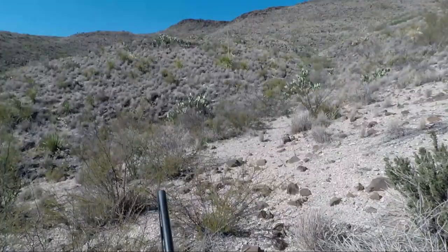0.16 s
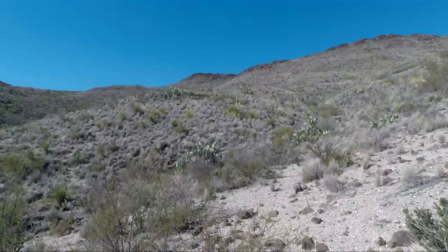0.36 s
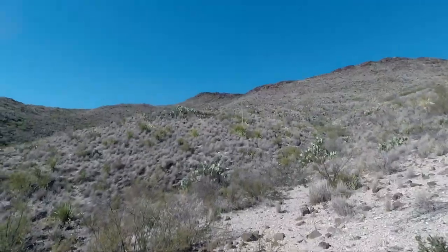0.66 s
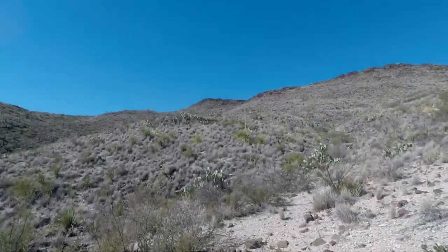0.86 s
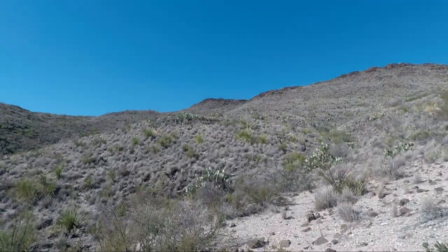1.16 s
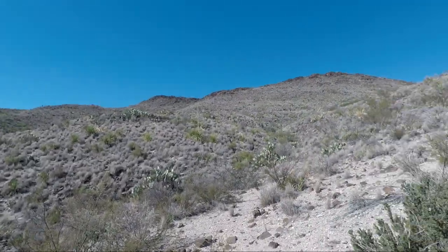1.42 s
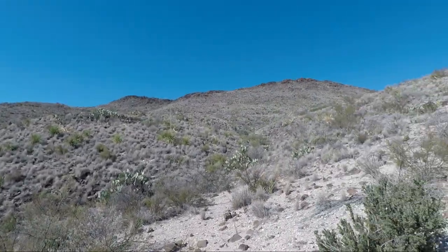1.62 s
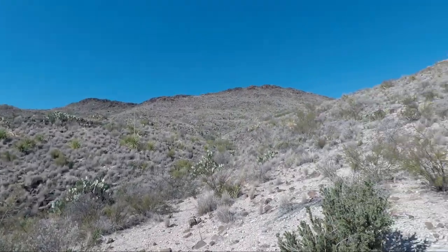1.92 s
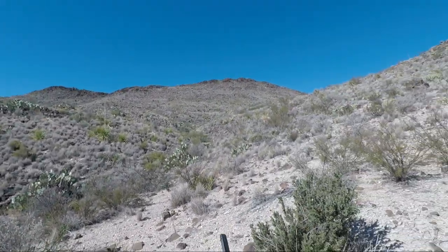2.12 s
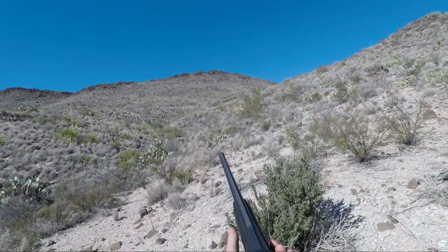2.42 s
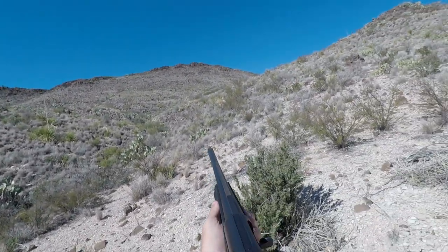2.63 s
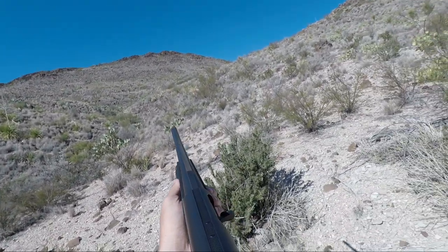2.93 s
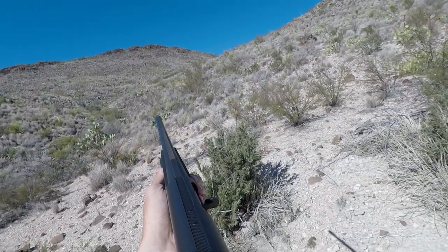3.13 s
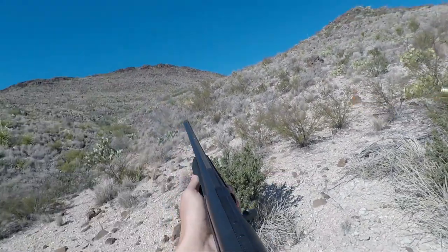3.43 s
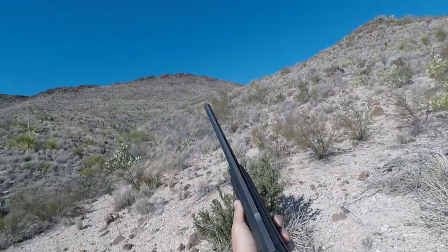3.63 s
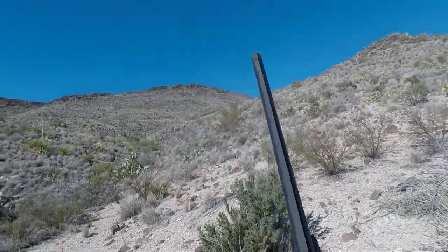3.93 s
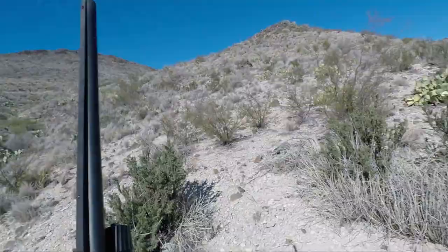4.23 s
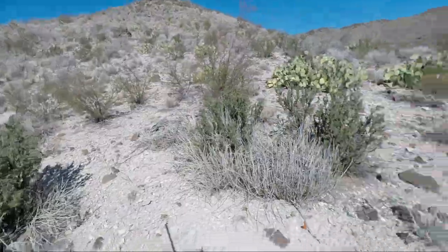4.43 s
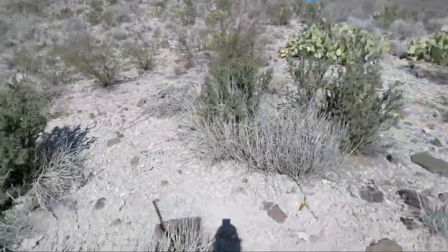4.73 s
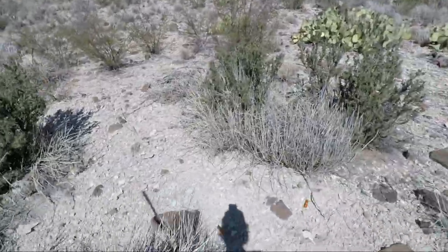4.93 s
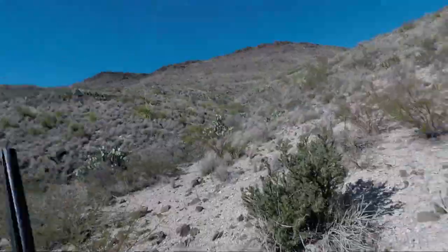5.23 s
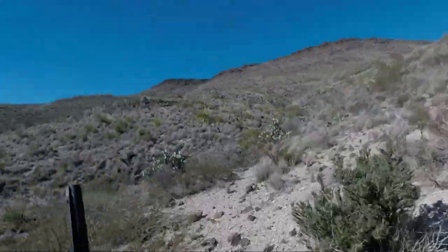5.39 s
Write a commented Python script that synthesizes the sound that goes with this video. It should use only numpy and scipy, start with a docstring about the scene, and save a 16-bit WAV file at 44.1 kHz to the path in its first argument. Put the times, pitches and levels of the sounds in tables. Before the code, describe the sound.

Close to a body-worn microphone, a shotgun action rattles and scrapes open early on, its barrel ringing briefly. Small metal clicks follow, then sharp clacks as a shell goes home. A heavy double knock and crack slam it shut, and the slope returns a long wash. Low wind throbs and pops throughout, mostly on the right, dropping after the slam, with little stone ticks and a rising gust at the end.

```python
"""Shotgun action on a windy hillside

A shotgun is handled just below a body-worn microphone: steel drags in stick-slip and struck modes decay
as the action scrapes open, the barrel rings, a shell clicks home and the action slams shut with a squeak.
Decaying noise and clustered echoes return the slam from the slope and outcrops. Shaped noise and sinking
tones make the wind, strongest at the right port, with grainy rustles; stones tick and a bird calls once."""
import sys
import numpy as np
from scipy import signal
from scipy.fft import rfft, irfft, next_fast_len
from scipy.io import wavfile
from scipy.ndimage import map_coordinates

SR = 44100
rng = np.random.default_rng(int(sys.argv[2]) if len(sys.argv) > 2 else 0)


def wav_record(signal):
    """Record a signal, one row per channel, as 16-bit PCM in the file named by sys.argv[1]."""
    frames = np.transpose(np.atleast_2d(signal))
    bounded = np.clip(frames, -1, 1)
    # unit amplitude maps onto the largest positive 16-bit level
    quanta = np.round(bounded * 32767).astype(np.int16)
    wavfile.write(sys.argv[1], SR, quanta)


N = 245195

# strength of the wind at the microphone, gust by gust: time_s, level_db
WIND_STRENGTH = [(0.0, -18.5), (0.16, -23.5), (0.25, -20.5), (0.31, -25.5), (0.38, -26), (0.5, -15.5),
                 (0.55, -32), (0.6, -20), (0.72, -33.5), (0.79, -28.5), (0.86, -33.5), (0.92, -24),
                 (0.99, -33), (1.12, -22.5), (1.27, -34), (1.38, -17.5), (1.52, -22), (1.63, -18.5),
                 (1.72, -23), (1.85, -17.5), (1.95, -14.5), (2.15, -16.5), (2.19, -23), (2.24, -16.5),
                 (2.32, -22), (2.4, -19.5), (2.56, -17.5), (2.63, -24.5), (2.7, -12.5), (2.78, -26),
                 (2.84, -14.5), (3.05, -27), (3.15, -20.5), (3.2, -25), (3.27, -16), (3.36, -34.5),
                 (3.42, -18.5), (3.54, -47.5), (3.78, -51.5), (4.3, -39.5), (4.53, -36.5), (4.62, -29),
                 (4.73, -36), (4.89, -29), (5.02, -35), (5.1, -22.5), (5.26, -16), (5.37, -20.5),
                 (5.56, -31)]
# spectrum of struck or rubbed steel: frequency_hz, density_db
STEEL_SPECTRUM = [(530, -31), (900, -7), (1580, 4), (2110, 4), (2470, 3), (3220, 0.5), (3900, -4),
                  (4850, -2.5), (6630, 0), (8240, -15.5), (9180, -15.5), (11500, -36.5), (12600, -32.5),
                  (15200, -37.5), (16000, -51.5)]
# spectrum of the stock and receiver: frequency_hz, density_db
BODY_SPECTRUM = [(120, -14.5), (300, -8), (700, -4), (1200, 0.5), (2000, -40)]
# blows of the closing action: time_s, relative knock_db, relative crack_db, crack_t60_s
BLOWS = [(3.2558, -31.5, -25, 0.02), (3.2779, -5, -18, .016), (3.2876, -3, -13, 0.015),
         (3.2951, -16.5, -2.5, 0.011), (3.2989, -14, 1, 0.0079)]


def amp(db):
    """Level to amplitude: 20 dB is a factor of ten."""
    return 10 ** (np.asarray(db) / 20)


def unit(x):
    """Normalisation to an rms of 1."""
    return x / np.sqrt(np.mean(x ** 2) + 1e-20)


def along(points, hz):
    """Interpolation of (frequency_hz, value) points on a logarithmic frequency axis."""
    f, v = np.transpose(points)
    return np.interp(np.log(hz + 1), np.log(f), v)


def curves(rows):
    """Linear interpolation in time: one curve for each column after time_s."""
    s, *cols = np.transpose(rows)
    return [np.interp(np.arange(N) / SR, s, c) for c in cols]


def wobble(rate):
    """Band-limited random modulation: a smooth curve through rate random knots a second."""
    knots = rng.standard_normal(int(N * rate / SR) + 4)
    return map_coordinates(knots, [np.arange(N) * rate / SR])


def filtered(x, response):
    """Linear filtering: the spectrum of x is multiplied by a response of frequency."""
    m = next_fast_len(N + SR // 2)
    return irfft(rfft(x, m) * response(np.fft.rfftfreq(m, 1 / SR)), m)[..., :N]


def mid_side(mid, side, apart):
    """Partial coherence: both channels share mid and take side with opposite signs."""
    return np.array([mid + apart * side, mid - apart * side])


def noise(colour, apart):
    """Coloured stereo noise of rms 1; apart sets the size of what the channels do not share."""
    white = rng.standard_normal((2, N))
    mid, side = filtered(white, lambda hz: amp(along(colour, hz)) * (hz > 12))
    return unit(mid_side(mid, side, apart))


def grains(colour, rate, spread_db, apart):
    """Shot noise: random clicks of uneven size, rate a second on average, coloured and set to rms 1."""
    happens = rng.random(N) < rate / SR
    size = amp(spread_db * np.minimum(rng.standard_normal(N), 2))
    clicks = happens * size * rng.choice([-1, 1], (2, N))
    mid, side = filtered(clicks, lambda hz: amp(along(colour, hz)))
    return unit(mid_side(mid, side, apart))


def pan(db):
    """Level difference between channels: left over right in dB, with a mean gain of 1."""
    gains = amp([[db / 2], [-db / 2]])
    return gains / gains.mean()


def since(s, length):
    """Local time: the samples that follow a moment, and their age in seconds."""
    i = np.arange(round(s * SR), min(round((s + length) * SR), N))
    return i, (i - i[0]) / SR


def fade(t, t60):
    """Exponential decay by 60 dB in t60 seconds, 1 ms at the shortest."""
    return np.exp(-np.log(1000) * t / max(t60, 1e-3))


def ring(modes, t):
    """Modal superposition: damped sines (frequency_hz, level_db, t60_s) struck together."""
    return sum(amp(db) * fade(t, t60) * np.sin(2 * np.pi * hz * t) for hz, db, t60 in modes)


def echo(x, t60s, hold=1):
    """Diffuse reverberation: noise with its own decay at each frequency; hold above 1 fills the early tail."""
    hz, t, z = signal.stft(rng.standard_normal((2, SR)), SR, nperseg=256)
    decay_db = -60 * (t / along(t60s, hz)[:, None]) ** hold
    tail = signal.istft(z * amp(decay_db), SR, nperseg=256)[1]
    return signal.fftconvolve(x.mean(0)[None], tail / np.linalg.norm(tail[0]), axes=1)[:, :N]


def ports(x):
    """Diffraction and phase lag: sound from the right reaches the left port shaded and out of step."""
    # phase by which the left port leads: frequency_hz, lead_rad
    lead = [(100, -1.5), (800, 1), (1600, -1.5), (3300, -5.5), (5500, -8.5), (10000, -8), (15000, -7.5)]
    # response of the left port relative to the right: frequency_hz, gain_db
    shade = [(150, -2), (600, 2), (1000, -18.5), (1700, -12), (3500, -9), (7000, -3), (12000, 0)]

    def response(hz):
        phase = along(lead, hz) * np.array([[.5], [-.5]])
        return np.exp(1j * phase) * amp(np.outer([1, 0], along(shade, hz)))
    return filtered(x, response)


def right_port(x):
    """Crosstalk: what strikes the right port leaks into the left channel, inverted above the bass."""
    # leak into the left channel: frequency_hz, signed gain
    leak = [(40, 0.98), (90, 0.36), (200, -0.17), (600, -0.46), (1200, -1.02)]
    return np.array([filtered(x, lambda hz: along(leak, hz)), x])


def air(rush_db=-1, twig_db=-6, twig_rate=250, spread_db=4):
    """Broadband turbulence: air rushes unevenly through dry, ticking twigs under a fine hiss."""
    # level of the rush in the brush, before rush_db: time_s, level_db
    rush_level = [(0, -56), (0.75, -59.5), (1.4, -56), (2.1, -53.5), (2.4, -57.5), (3.3, -57.5),
                  (3.95, -65.5), (4.3, -64), (5.0, -60.5), (5.2, -55.5), (5.56, -59)]
    # spectrum of the rush: frequency_hz, density_db
    rush_colour = [(150, -7), (350, -1), (800, -2), (1600, -5.5), (2400, -15.5), (4000, -27), (8000, -45),
                   (14000, -70)]
    # relative level of the treble hiss: time_s, level_db
    hiss_level = [(0, -56), (0.3, -57.5), (0.8, -59.5), (1.4, -56), (2.2, -59), (3.34, -57.5),
                  (3.46, -76.5), (3.85, -80.5), (4.55, -73), (5.3, -63)]
    # spectrum of the hiss: frequency_hz, density_db
    hiss_colour = [(1200, -5.5), (3200, 0.5), (5000, -5), (7000, -1.5), (8500, -3.5), (10300, -4.5),
                   (12000, -10.5), (15000, -35)]
    twigs = grains(rush_colour, twig_rate, spread_db, apart=0.22)
    rush = noise(rush_colour, apart=0.14) + amp(twig_db) * twigs
    level_db = curves(rush_level)[0] + rush_db + 1.0 * wobble(5.4) + 2.2 * wobble(110)
    hiss = noise(hiss_colour, apart=0.92) * amp(curves(hiss_level)[0] - 2.0)
    return rush * amp(level_db) * pan(0.5) + hiss


def gust():
    """Relative level: how far the wind is above its usual strength, in dB."""
    usual_db = -21
    return curves(WIND_STRENGTH)[0] - usual_db


def wind(buffet_db=-20, uneven_db=1.5, left_db=-11):
    """Flow noise: eddies throb at the ports, with a faster flutter above them, mostly on the right."""
    # spectrum of the eddies: frequency_hz, density_db
    buffet = [(11, -38), (18, -14), (28, 5.5), (41, 4), (52, -5), (70, -15.5), (110, -21), (140, -54),
              (240, -120)]
    # spectrum of the flutter: frequency_hz, density_db
    flutter_colour = [(40, -26), (70, 1.5), (95, -0.5), (140, -11), (200, -14.5), (300, -15.5), (600, -25),
                      (1200, -27.5), (2500, -61)]
    flutter_db, flutter_grows = -36, 0.59  # level in the usual wind, dB per dB of wind
    eddies = signal.hilbert(noise(buffet, apart=0.28))
    throb = unit(eddies.real / (np.abs(eddies) + 1))  # the swing is evened out; gusts set its size
    flutter_level_db = flutter_db + flutter_grows * gust() + 3 * wobble(25)
    left, right = noise(flutter_colour, apart=1) * amp(flutter_level_db)
    flutter = right_port(right) + amp(left_db) * right_port(left)[::-1]
    return throb * amp(buffet_db + gust() + uneven_db * wobble(8.8)) * pan(-14.0) + flutter


def pops(rise_s=0.00085, puff_t60_s=0.091, push_gain_db=10, puff_gain_db=13.5, count=16):
    """Vortex impact: each push swells as its pitch drops, with a puff of turbulence and a shaking mount."""
    # the strongest dull pops: time_s, relative push_db, start_hz, relative puff_db
    strong = [(0.088, -21, 630, -44.5), (0.247, -21, 130, -54), (0.284, -18.5, 129.5, -52),
              (1.359, -17.5, 329, -37), (1.992, -17, 400, -38), (2.099, -11, 620, -30.5),
              (2.121, -18.5, 562.5, -35.5), (2.314, -18.5, 198, -59), (2.536, -18, 902, -41.5),
              (2.665, -21.5, 333, -49), (2.715, -14.5, 611.6, -38.5), (2.853, -16.5, 400, -45),
              (2.871, -17.5, 130, -52), (2.943, -15, 559.5, -45), (3.104, -18, 420, -60),
              (3.191, -18.5, 452, -53), (3.273, -15.5, 400, -29), (3.303, -16, 399, -32.5),
              (3.396, -10, 336, -52.5), (4.171, -25.5, 395, -49.5), (4.204, -31.5, 454.5, -50.5),
              (4.427, -26.5, 598, -52.5), (4.96, -37, 279, -58.5), (5.074, -19, 700.5, -35.5),
              (5.091, -33.5, 600, -47.5), (5.150, -20.5, 527, -37.5), (5.251, -24, 421, -48),
              (5.279, -15.5, 259, -42.5), (5.336, -21, 620, -47), (5.372, -19.5, 430, -43),
              (5.455, -19, 127.5, -55.5), (5.511, -19, 490, -51)]
    # spectrum of the puff: frequency_hz, density_db
    puff_colour = [(70, -18), (150, -10), (250, 8.5), (380, -2.5), (600, -7.5), (1200, -18.5), (4000, -57)]
    push_end_hz, push_fall_s = 71, .0052  # the pitch sinks towards this, with this time constant
    push_rise_s, push_t60_s = 0.0074, 0.057
    mount_hz, mount_db, mount_t60_s = 99, -11.5, .2  # level relative to push_db
    # chance pops, relative to the wind
    small_push_db, small_puff_db, small_start_hz = -12.5, -34.5, 307
    out, puff = np.zeros(N), noise(puff_colour, apart=0)[0]
    times = rng.uniform(0, N / SR - .05, count)
    winds_db = np.interp(times, *np.transpose(WIND_STRENGTH))
    small = [(s, db + small_push_db, small_start_hz, db + small_puff_db) for s, db in zip(times, winds_db)]
    for s, push_db, start_hz, puff_db in small + strong:
        i, t = since(s, 0.18)
        pitch_hz = push_end_hz + (start_hz - push_end_hz) * np.exp(-t / push_fall_s)
        swell = 1 - np.exp(-(t / push_rise_s) ** 2)
        push = np.sin(2 * np.pi * np.cumsum(pitch_hz) / SR) * swell * fade(t, push_t60_s)
        shake = amp(mount_db) * ring([(mount_hz, 0, mount_t60_s)], t) * swell
        turbulence = puff[i] * fade(t, puff_t60_s) * (1 - np.exp(-t / rise_s))
        out[i] += amp(push_db + push_gain_db) * push + amp(push_db) * shake
        out[i] += amp(puff_db + puff_gain_db) * turbulence
    return right_port(out)


def rustles(grain_rate=1800, spread_db=3, rise_share=0.07, count=2):
    """Granular noise: grainy rustles at the microphone, rubbed or buffeted by wind; softer ones follow at random."""
    # rustles at the microphone: start_s, relative level_db, t60_s
    bursts = [(0.246, -29, 0.018), (0.3168, -29.5, 0.019), (1.379, -29.5, 0.044), (1.4014, -26, 0.018),
              (1.925, -36, 0.076), (1.949, -28, 0.13), (2.102, -29.5, 0.064), (2.137, -27.5, 0.041),
              (2.183, -35.5, 0.052), (2.274, -33.5, 0.039), (3.039, -32.5, 0.014), (5.01, -38, 0.028),
              (5.076, -36, 0.083), (5.163, -37, 0.059), (5.1953, -29, 0.021), (5.213, -50, 0.035),
              (5.303, -37, 0.067), (5.327, -44.5, 0.033), (5.386, -37, 0.03)]
    # spectrum of the grains: frequency_hz, density_db
    rustle_colour = [(350, -29), (800, 19.5), (1500, 8), (2400, 3.5), (3600, -15.5), (7000, -11),
                     (12000, -63)]
    follow_s, follow_db = 0.13, -15.5  # softer rustles follow within this time, at this relative level
    envelope = np.zeros(N)
    delays = follow_s * rng.random((len(bursts), count))
    following = [(min(s + d, N / SR - .01), db + follow_db, t60)
                 for (s, db, t60), row in zip(bursts, delays) for d in row]
    for s, db, t60 in bursts + following:
        i, t = since(s, 0.15)
        rise = 1 - np.exp(-t / (rise_share * t60))  # long rustles start softly
        envelope[i] += amp(db - 4.5) * fade(t, t60) * rise
    return envelope * grains(rustle_colour, grain_rate, spread_db, apart=1.0) * pan(-7.5)


def bird(glide_t60_s=0.034, waver=0.013):
    """Frequency modulation: one faint call tumbles down in broken, gliding steps."""
    # steps of the call, each gliding towards its target: start_s, length_s, start_hz, target_hz, level_db
    chips = [(2.258, .008, 6300, 6300, -64), (2.269, .017, 7300, 5500, -55), (2.278, .011, 4650, 4360, -46),
             (2.285, 0.014, 4200, 3900, -51.5)]
    out, unsteady = np.zeros(N), 1 + waver * wobble(600)
    for s, length, start_hz, target_hz, db in chips:
        i, t = since(s, max(length, .004))
        pitch_hz = (target_hz + (start_hz - target_hz) * fade(t, glide_t60_s)) * unsteady[i]
        out[i] += amp(db) * np.sqrt(np.hanning(len(i))) * np.sin(2 * np.pi * np.cumsum(pitch_hz) / SR)
    return out


def stones(t60_s=0.029, note_db=-4, rise_s=0.000093):
    """Impact of small solids: stones click with a noise burst, a brief note each and a duller clack."""
    # ticks of loose stones: time_s, relative level_db, note_hz, clack_db
    ticks = [(4.0168, -36.5, 3830, 1), (4.068, -46, 3900, 1.5), (4.19, -53, 3660, -4),
             (4.25, -52.5, 3920, -15), (4.2842, -53.5, 3840, -12), (4.338, -48.5, 3950, 0),
             (4.586, -56.5, 3956, -1), (4.947, -47, 3990, -12), (5.106, -46.5, 3710, -14),
             (5.274, -41, 890, -5), (5.437, -50, 4130, -14), (5.4882, -60, 4250, -16)]
    # spectrum of the click: frequency_hz, density_db
    click_colour = [(1000, -9), (2400, -9), (3800, 0), (5000, -8), (6800, -0.5), (9000, -11), (14000, -23)]
    clack_hz = 1251
    out, click = np.zeros((2, N)), noise(click_colour, apart=1.0)
    for s, db, note_hz, clack_db in ticks:
        i, t = since(s, .08)
        notes = ring([(note_hz, note_db, t60_s), (clack_hz, clack_db, t60_s)], t)
        out[:, i] += amp(db - 5.5) * (fade(t, t60_s) * click[:, i] + notes) * (1 - np.exp(-t / rise_s))
    return out


def outcrops(facet_rate=900, spread_db=4):
    """Discrete reflection and air absorption: rock faces return grainy clusters, duller the later they come."""
    # clusters thrown back from the slam: arrival_s, relative level_db, spread_s
    arrivals = [(3.554, -47, 0.046), (3.613, -50, 0.089), (3.687, -48.5, 0.021), (3.737, -54, 0.015),
                (3.79, -55.5, 0.055), (3.872, -57, 0.02)]
    # spectrum of the clusters before air loss: frequency_hz, density_db
    facet_colour = [(300, -28), (800, 1), (1300, 0.5), (2300, -4.5), (3300, -0.5), (4500, -7.5),
                    (7000, -10), (11000, -50)]
    # air absorption: frequency_hz, loss_db per second of travel
    air_loss = [(1000, 1.5), (3000, 9), (7000, 32)]
    out, facets = np.zeros((2, N)), grains(facet_colour, facet_rate, spread_db, apart=0.59)
    for s, db, spread in arrivals:
        i, t = since(s, max(spread, .005))
        travel_s = s - BLOWS[-1][0]
        loss = amp(-travel_s * along(air_loss, np.fft.rfftfreq(len(i), 1 / SR)))
        out[:, i] += amp(db) * np.sqrt(np.hanning(len(i))) * irfft(rfft(facets[:, i]) * loss, len(i))
    return out


def slope(apart=0.24):
    """Diffuse scattering: rock and scrub return the slam as a smooth wash that loses its treble first."""
    # decay of the wash: frequency_hz, t60_s
    wash_t60 = [(150, 4), (1500, 3.5), (4000, 1.1), (7000, 0.72), (12000, 0.2)]
    # spectrum of the wash: frequency_hz, gain_db
    wash_colour = [(50, -0.5), (130, 12.5), (250, 9), (500, 3.5), (1500, -4), (2400, -7.5), (3400, 1.5),
                   (5200, -4.5), (6800, 1), (9000, -8.5), (15000, -23)]
    slam = np.zeros((1, N))
    slam[0, round(BLOWS[-1][0] * SR)] = amp(-4.0)
    mid, side = filtered(echo(slam, wash_t60, hold=0.76), lambda hz: amp(along(wash_colour, hz)))
    return mid_side(mid, side, apart)


def barrel(thump_hz=150, thump_db=-19, thump_t60_s=0.12):
    """Free vibration: the barrel rings on when the opening action hits its stop, and the stock thumps."""
    # barrel modes: frequency_hz, relative level_db, t60_s
    modes = [(824, -12, 0.75), (1653, -22, 0.65), (2864, -19, 0.33), (3117, -19, .27), (3515, -11, 0.42),
             (5114, -11, 0.8), (5685, -8, 0.3), (5780, -4, .13), (6450, 17, 0.045), (6896, -17, .3)]
    out = np.zeros(N)
    i, t = since(.4625, 1)
    out[i] = amp(-36.0) * ring(modes, t) + ring([(thump_hz, thump_db, thump_t60_s)], t)
    return out * pan(-1)


def slides(slip_rate=900, spread_db=5, rub_db=-7, note_width=1.5, judder_db=2.0):
    """Stick-slip friction: juddering streams of tiny slips excite steel, body and one broad resonance."""
    # strokes of steel on steel, swelling (if positive) to the end:
    # start_s, end_s, end_db, swell_db, relative body_db, resonance_hz, relative resonance_db
    strokes = [(0.001, 0.135, -56.5, -1.5, -16.5, 3400, -3.5), (0.379, 0.46, -25, 11.5, -3, 5740, -2),
               (1.811, 1.871, -27.5, 14, -14.5, 2600, -8), (3.264, 3.297, -29, 9, 1, 690, 4)]
    out = np.zeros((2, N))
    slips = grains(STEEL_SPECTRUM, slip_rate, spread_db, apart=0.26)
    steel = unit(slips + amp(rub_db) * noise(STEEL_SPECTRUM, apart=0.58))
    body, judder = grains(BODY_SPECTRUM, slip_rate, spread_db, apart=0.48), judder_db * wobble(250)
    for start, end, end_db, swell_db, body_db, note_hz, note_db in strokes:
        i, t = since(start, max(end - start, .005))
        resonance = [(note_hz / note_width, -40), (note_hz, 0), (note_hz * note_width, -40)]
        note = grains(resonance, slip_rate, spread_db, apart=0.19)
        force = amp(end_db + np.linspace(-swell_db, 0, len(i)) + judder[i])
        force = force * signal.windows.tukey(len(i), .1)
        out[:, i] += force * (steel[:, i] + amp(body_db) * body[:, i] + amp(note_db) * note[:, i])
    return out


def clacks(chatter_db=2, after_db=-24, after_t60_s=0.14, rise_s=0.00044, waver=0.92):
    """Impact excitation: each contact bursts into damped dense modes with two clear notes and a ping."""
    # steel contacts in the gun: time_s, relative level_db, body_db, edge_db, t60_s,
    # low_note_hz, low_note_db, high_note_hz, high_note_db
    contacts = [(0.139, -32, -8.5, -20, 0.029, 3270, 0, 8500, -11),
                (0.3874, -11, -16, -18.5, .018, 1700, -1, 2820, 0.5),
                (0.392, -18.5, -21.5, -4, 0.0091, 5330, 0, 7250, -1),
                (0.402, -13.5, -10, -1.5, 0.029, 1190, -3.5, 7100, 3.5),
                (0.4114, -15.5, -8, -11, 0.039, 3280, -5, 6250, -1),
                (0.424, -25, -10, 4, 0.029, 3300, -8.5, 5850, 4),
                (0.437, -12.5, -4.5, -9, 0.022, 1600, -3.5, 5950, 0),
                (0.4400, -13.5, -5.5, -10, .028, 1200, -11, 7300, 3),
                (0.4458, -19, -12.5, -1, .02, 2700, -6.5, 6420, 1),
                (0.4577, -16.5, -22, 5, 0.0046, 5000, -3, 7015, 0),
                (0.462, -10.5, -8, 2.5, 0.026, 1653, 4, 6490, 4),
                (0.4638, -19, -20.5, -4, .018, 3200, 3, 8980, 9),
                (0.4679, -13.5, -10.5, -10, .024, 3200, 0.5, 5966, 1),
                (0.485, -35, -4, -16, 0.073, 1800, -8.5, 5730, -10),
                (0.5153, -32, 3, -19, 0.031, 1720, -1.5, 5620, -8),
                (0.531, -41, -9, -5, .025, 3500, -3, 6300, -2),
                (0.9804, -20, -26.5, -20, 0.0097, 2770, -4.5, 6500, -1),
                (0.99, -31.5, -21.5, -24, 0.015, 1810, -9, 3720, -2),
                (1.235, -34, -8.5, -14, 0.021, 2430, 5, 3970, -18),
                (1.26, -31.5, -2.5, -5, 0.033, 1030, 2.5, 7000, -7),
                (1.2939, -22, -19, -18, 0.032, 5230, -4, 7100, -5),
                (1.4942, -30, -6.5, -13, 0.011, 2190, -4, 4500, -17),
                (1.6717, -23, -15, -8, 0.01, 3830, -3, 6200, -8),
                (1.704, -39.5, -10, -19, 0.027, 2000, -6.5, 3400, -10),
                (1.8017, -25, -11.5, -1, 0.0098, 4100, -23, 7200, -7),
                (1.844, -25.5, -11.5, -8, 0.015, 3350, 1, 5700, -3),
                (1.8729, -10.5, -15.5, -4, 0.022, 2430, -4, 7200, -6),
                (1.8793, -11, -12.5, -6.5, 0.026, 5850, 1.5, 6850, 5),
                (1.888, -32.5, -2.5, -10, 0.026, 1500, 0, 2600, -6.5),
                (1.971, -18, -14, -15, 0.014, 2520, -4.5, 5850, 1),
                (1.978, -10.5, -10, -11, 0.017, 1640, 4.5, 6250, 2.5),
                (1.998, -31.5, 0, -14, 0.03, 920, 0, 5900, -11),
                (3.323, -34, -14, -19, 0.02, 4000, -11, 5200, -5.5),
                (3.4157, -32.5, -26, -3, 0.029, 5000, -7, 6700, -19),
                (3.424, -30.5, -1, -12, 0.017, 3770, 0, 4500, -2),
                (3.477, -37, 0.5, -11.5, 0.022, 4540, -13, 7600, -11)]
    # spectrum of the bright edge: frequency_hz, density_db
    edge_colour = [(4500, -25), (6600, 5), (7600, -2), (9000, -9.5), (10500, -16.5), (12000, -24.5),
                   (15500, -28)]
    # ringing modes of the receiver: frequency_hz, relative level_db, t60_s
    receiver = [(1650, -19, 0.11), (3200, -4.5, 0.034), (4050, -3.5, 0.051), (5650, -13.5, .06),
                (5720, 1, 0.035)]
    ping_db = -16.5  # the receiver's ping, relative to its contact
    out = np.zeros((2, N))
    steel, body = noise(STEEL_SPECTRUM, apart=0.45), noise(BODY_SPECTRUM, apart=0.12)
    edge = noise(edge_colour, apart=0.18)
    chatter, drift = amp(chatter_db * wobble(900)), waver * wobble(700)  # drift is a phase in radians
    for s, db, body_db, edge_db, t60, low_hz, low_db, high_hz, high_db in contacts:
        i, t = since(s, 0.17)
        burst = steel[:, i] + amp(body_db) * body[:, i] + amp(edge_db) * edge[:, i]
        low = amp(low_db) * np.sin(2 * np.pi * low_hz * t + drift[i])
        high = amp(high_db) * np.sin(2 * np.pi * high_hz * t - drift[i])
        buzz = amp(after_db) * fade(t, after_t60_s) * burst  # loose parts buzz on briefly
        contact = ((burst + low + high) * fade(t, t60) + buzz) * chatter[i]
        contact = contact + amp(ping_db) * ring(receiver, t)
        out[:, i] += amp(db - 3.0) * contact * (1 - np.exp(-t / rise_s))
    return out


def squeak(hz=7920):
    """Friction-driven oscillation: dry steel sings for an instant, swelling until the lock catches."""
    level_db, = curves([(3.265, -41), (3.272, -39), (3.286, -22), (3.294, -33.5)])
    i, t = since(3.264, .033)
    pitch_hz = hz * (1 + 0.0017 * wobble(300)[i])
    out = np.zeros(N)
    tone = np.sin(2 * np.pi * np.cumsum(pitch_hz) / SR)
    out[i] = amp(level_db[i]) * signal.windows.tukey(len(i), .2) * tone
    return out


def closing(rise_s=0.0011):
    """Damped impact: blows knock dully, two of them close together, and the lock cracks, hardest at the end."""
    # damped tones of the knock: frequency_hz, relative level_db, t60_s
    knock_tones = [(225, -7.5, 0.011), (405, -12, 0.02), (555, -2, 0.021), (686, 0.5, 0.024),
                   (1217, -15, 0.028), (1441, -18.5, 0.022), (3700, -10, 0.015)]
    # spectrum of the lock's crack: frequency_hz, density_db
    lock = [(350, -27), (600, -4), (1000, -5.5), (1330, -0.5), (2370, -5.5), (3530, 0), (4900, -3),
            (6450, -14), (7200, -9.5), (12100, -23.5), (14500, -28.5), (16000, -37)]
    out, crack = np.zeros((2, N)), noise(lock, apart=0.48)
    for s, knock_db, crack_db, crack_t60 in BLOWS:
        i, t = since(s, 0.075)
        knock = amp(knock_db) * ring(knock_tones, t)
        blow = knock + amp(crack_db + 5.0) * crack[:, i] * fade(t, crack_t60)
        out[:, i] += blow * (1 - np.exp(-t / rise_s))
    return out * pan(.5)


def scene():
    """Superposition: the gun, first at the right and then raised, with its reflections, in the wind."""
    raised_s = 2.6  # from here on the action is heard from the middle
    action = clacks() + slides()
    gun = np.where(np.arange(N) / SR < raised_s, ports(action), action) + closing()
    ground = amp(-17.5) * echo(gun, [(300, 0.063), (6000, 0.09), (14000, 0.048)])  # frequency_hz, t60_s
    near = gun + squeak() + barrel() + ground
    far = slope() + outcrops()
    return near + far + stones() + rustles() + bird() + wind() + pops() + air()


def record(dry):
    """Saturation and band limiting: peaks are rounded off at full scale and the highest treble is cut."""
    top_hz = 15900
    rounded = dry / (1 + np.abs(dry) ** 6) ** (1 / 6)
    return signal.sosfilt(signal.ellip(10, .1, 90, top_hz, fs=SR, output="sos"), rounded)


dry = scene()
out = record(dry)
wav_record(out)
```